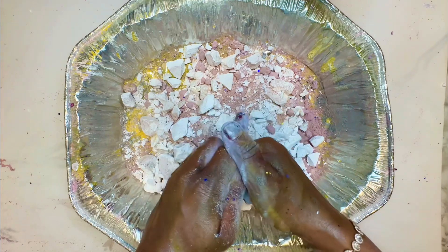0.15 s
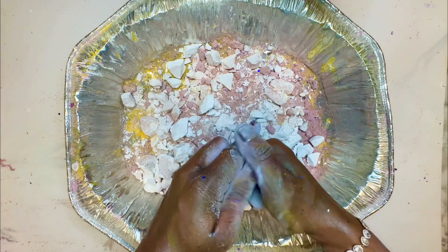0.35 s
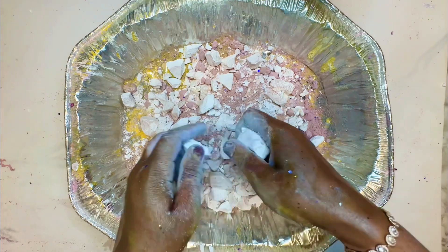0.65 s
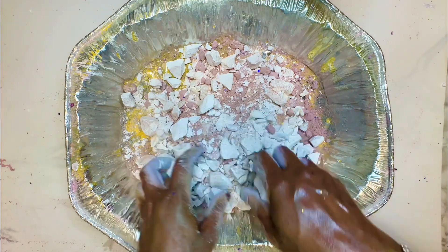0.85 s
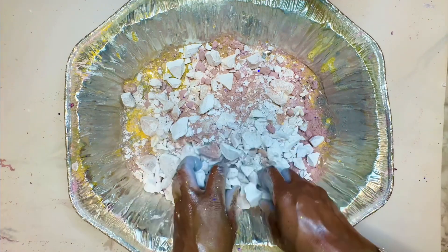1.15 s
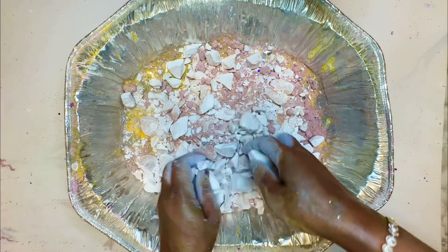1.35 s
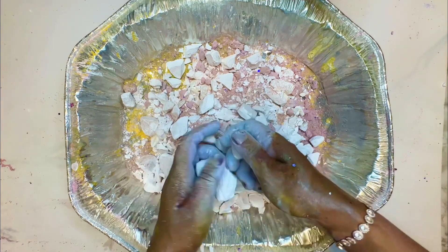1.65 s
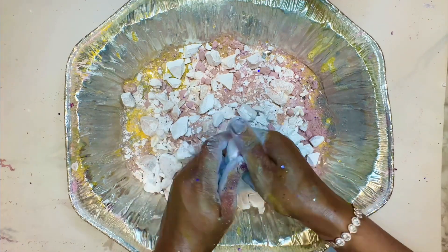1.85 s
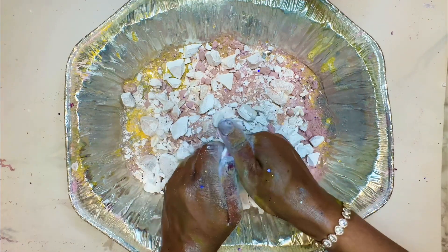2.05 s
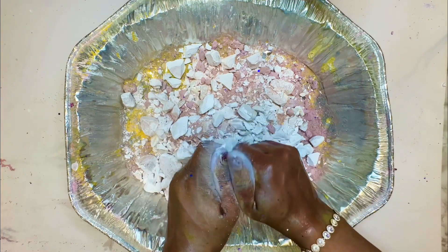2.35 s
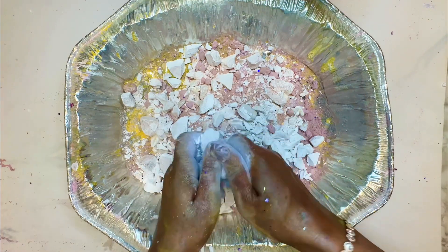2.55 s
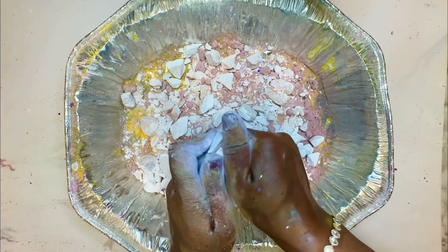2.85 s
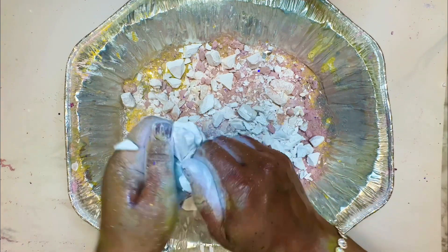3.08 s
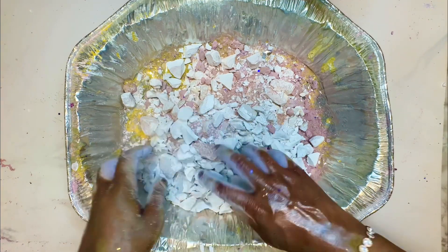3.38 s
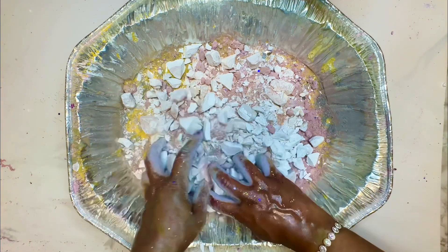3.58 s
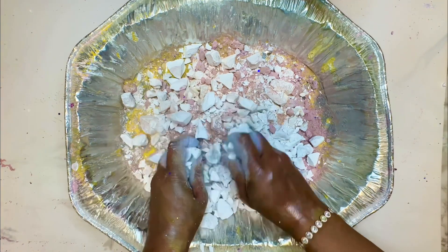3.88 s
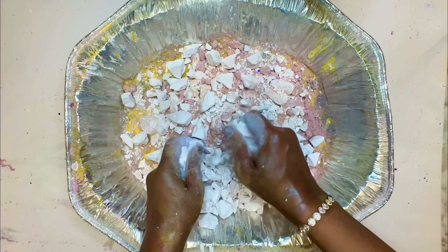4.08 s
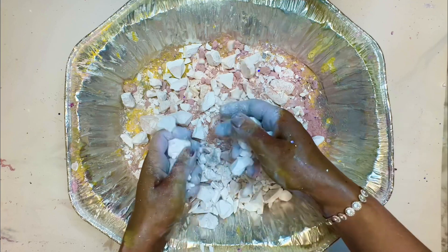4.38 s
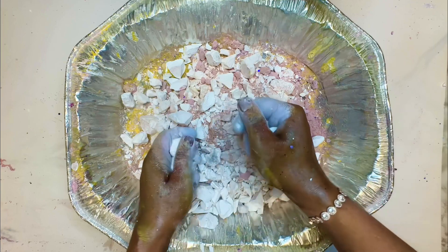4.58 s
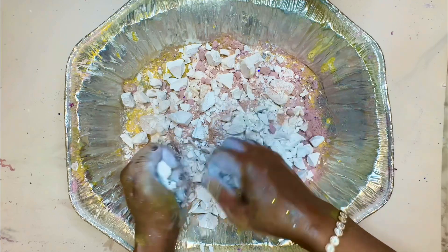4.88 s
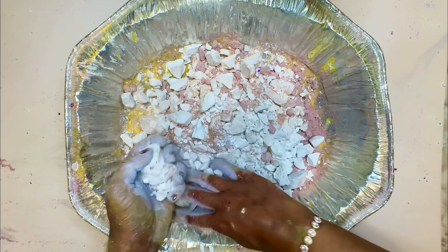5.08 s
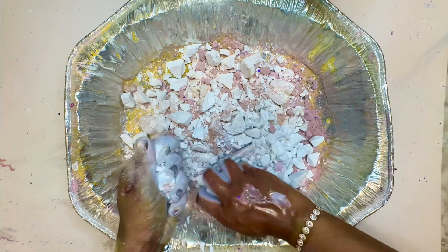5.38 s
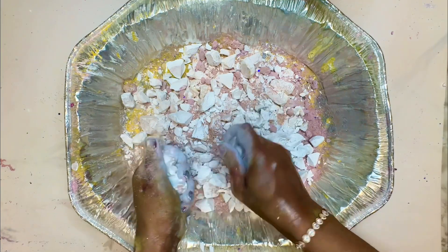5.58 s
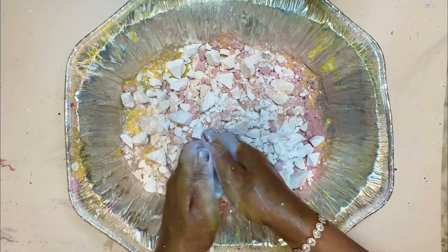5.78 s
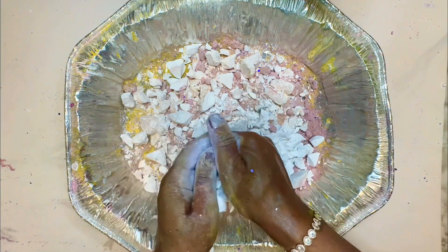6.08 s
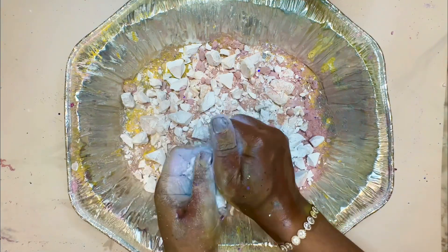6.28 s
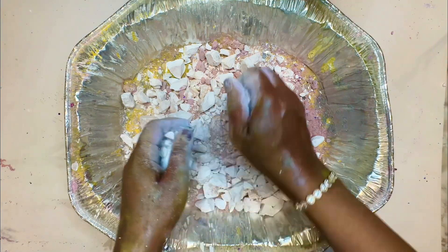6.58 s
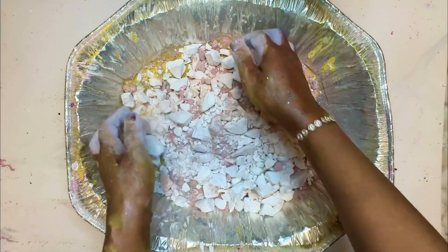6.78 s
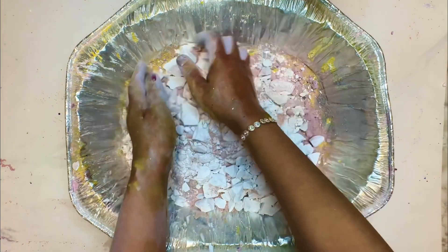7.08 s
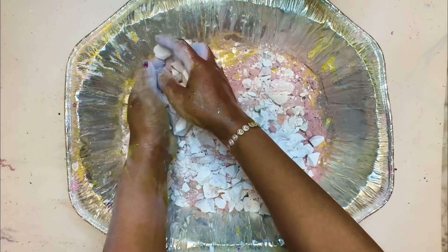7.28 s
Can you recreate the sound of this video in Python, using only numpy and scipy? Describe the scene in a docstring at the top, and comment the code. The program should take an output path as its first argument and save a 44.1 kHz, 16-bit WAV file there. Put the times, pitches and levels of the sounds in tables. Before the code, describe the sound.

Close up in a small, dry room, two hands squeeze brittle dried chalk. Sparse snaps and soft powdery squeezes come first, with a short rattle of pieces on the thin metal tray, then a loud crack. Midway come raking and dense crunching; after quieter squeezing, loud clattering strokes sweep through the heap at the end. A low motor hum flutters rapidly underneath.

```python
"""A steady motor hum, beating ten times a second, runs throughout; over it two hands crush dried chalk.
Brittle fracture snaps the pieces: each break excites damped modes of the piece and a bright crack.
Pieces knock a thin metal tray, whose dispersive bending waves color the note, and are raked through crumbs.
Granular flow makes the crunch: thousands of small resonant contacts follow the effort of the hands.
A small room adds a diffuse tail; two closely placed microphone ports pick it up and the hardest blows clip."""
import sys
import numpy as np
from scipy import signal
from scipy.fft import rfft, irfft, next_fast_len
from scipy.io import wavfile
from scipy.ndimage import uniform_filter1d

SR = 44100
rng = np.random.default_rng(int(sys.argv[2]) if len(sys.argv) > 2 else 0)


def to_wav(s):
    """Save 16-bit WAV."""
    ch = np.atleast_2d(s).T  # columns
    pcm = np.round(np.clip(ch, -1, 1) * 32767)  # PCM
    wavfile.write(sys.argv[1], SR, pcm.astype(np.int16))


N = 327662  # length in samples
BLOW = np.arange(2800) / SR  # time axis of one blow, s

# pieces breaking in the hands: (t/s, crumbling time/ms, ring f/Hz, ring level/dB, crack level/dB)
SNAPS = [(0.3654, 1.7, 1340, -18, -25), (0.367, 2.9, 2700, -21.5, -16), (0.6131, 2.4, 2960, -31.5, -21.5),
         (0.6191, 0.7, 4150, -30, -17.5), (0.635, 0.75, 2080, -32.5, -27.5), (0.7005, 1.9, 3830, -42, -44),
         (0.7622, 3.4, 2220, -33.5, -44), (0.8, 0.85, 3120, -47.5, -61), (0.92, 2.1, 3304, -50, -38.5),
         (1.143, .7, 3900, -40.5, -25.5), (1.148, 1, 2540, -28, -41), (1.162, 0.82, 990, -31.5, -29),
         (1.3238, 1.7, 2440, -21.5, -39), (1.5534, 2, 1340, -38, -77), (1.5744, 0.3, 814, -38, -82),
         (1.886, 0.87, 3070, -33.5, -47), (1.909, 3.1, 2770, -55, -39), (2.225, 1.2, 1240, -15, -29),
         (2.2262, 0.35, 2520, -17.5, -21), (2.4934, 4.5, 2580, -40, -32), (2.504, 4.9, 2440, -37.5, -43),
         (2.6702, 0.66, 1980, -36.5, -49.5), (2.7956, 0.52, 2900, -42.5, -47),
         (2.8747, 0.7, 1415, -10, -15), (2.875, 0.94, 910, -14, -22), (2.885, 3.5, 1040, -25, -25),
         (2.9, 2.3, 4200, -23, -16.5), (2.931, 0.74, 3000, -22, -25.5), (3.03, 1.8, 4450, -44, -29.5),
         (3.2423, 5.9, 1925, -40.5, -39), (3.27, 2.1, 3000, -43, -34), (3.2932, 2.1, 3080, -25.5, -28),
         (3.3118, 1.2, 2565, -34, -24.5), (3.417, 2, 2200, -28, -28), (3.665, 2, 3000, -45, -21),
         (3.728, 3.7, 2900, -34.5, -28.5), (3.9082, 1.7, 3200, -34, -28), (3.9869, 1.7, 4100, -28.5, -24.5),
         (4.017, 0.91, 3580, -32.5, -21), (4.0332, 8.7, 3080, -25.5, -18.5),
         (4.0535, 1.1, 3300, -14.5, -17.5), (4.0609, 9.4, 4000, -20, -20.5), (4.096, 0.75, 3500, -36, -32),
         (4.134, 6.2, 4130, -30.5, -34), (4.197, 4.4, 4200, -37.5, -30.5), (4.3745, 3, 2420, -6, -30),
         (4.5217, 2.2, 2170, -21.5, -25.5), (4.548, 3, 3500, -33, -28), (4.5818, 0.54, 2360, -14.5, -23),
         (4.582, 1.6, 1590, -20, -18), (4.6104, 4.1, 4230, -30.5, -22.5), (4.6364, 1.1, 3180, -22, -24),
         (4.639, 0.64, 3520, -19.5, -25), (4.698, 1.5, 2880, -17.5, -19), (4.7487, 5.9, 2800, -23.5, -21.5),
         (4.7659, 1.7, 2340, -22.5, -22), (4.792, 2, 3000, -33.5, -30), (4.809, 1.5, 2800, -32.5, -38),
         (4.8334, 2.9, 2300, -23.5, -20.5), (4.8428, 0.52, 3360, -19.5, -18),
         (4.8487, 0.59, 2900, -18.5, -22), (4.857, 1.1, 2630, -23, -31), (4.8751, 2, 2760, -21, -23.5),
         (4.886, 2.1, 2800, -31, -23.5), (4.938, 3.8, 2840, -35.5, -30), (5.047, 0.71, 3010, -37.5, -48),
         (5.176, 2, 2480, -34, -48), (5.295, 3.9, 3300, -39, -24.5), (5.3721, 0.92, 2670, -25, -24),
         (5.3809, 1.2, 2580, -26.5, -24.5), (5.4341, 5.8, 1480, -28.5, -30.5),
         (5.447, 2, 3500, -39.5, -31.5), (5.557, 1.8, 1990, -38, -37), (5.632, 13, 3470, -35.5, -31),
         (5.744, 4, 3600, -46, -37.5), (5.7826, 3, 2050, -40.5, -42), (5.879, 2.6, 4150, -36.5, -41.5),
         (6.002, 0.84, 4500, -43.5, -31), (6.09, 2.8, 2160, -36, -36), (6.1449, 0.56, 3940, -40.5, -40.5),
         (6.192, 0.34, 1460, -13, -13.5), (6.1972, 1.9, 2610, -21, -24), (6.2026, 1.1, 2480, -30, -16.5),
         (6.219, 0.97, 2780, -17.5, -31), (6.2318, 1.6, 1260, -17.5, -26.5),
         (6.2352, 2.2, 3010, -15, -10.5), (6.31, 0.5, 2580, -12.5, -23), (6.3104, 1.1, 1980, -20, -26),
         (6.414, 1.2, 2100, -35.5, -46), (6.4886, 3.1, 2480, -43, -44), (6.6633, 6.7, 2744, -31.5, -30),
         (6.681, 2, 3500, -41, -30.5), (6.746, 4, 3020, -24.5, -17.5), (7.1545, 1.9, 3000, -25, -25),
         (7.196, 4.4, 2400, -22, -24.5), (7.42, 1.3, 3500, -38.5, -27)]
SNAP_CYCLES = 2.6  # cycles of ringing to 1/e
PALM_HZ, PALM_DB = 566, -15.5  # dull knock of the cupped hands; level against the ring


def snaps():
    """Brittle fracture: chalk breaks and rings between the fingers, and the cupped hands resonate dully."""
    out = np.zeros((2, N))
    for s, ms, hz, ring_db, crack_db in SNAPS:
        add(out, s, piece(ms, hz, ring_db, crack_db, cycles=SNAP_CYCLES, dull_db=-6))
        push = fracture(ms, width=0.15, first=1.13)
        palm = through(push, mode(PALM_HZ, cycles=1.5, wave=np.cos))
        add(out, s, sized(palm, ring_db + PALM_DB))
    return out


# color of a ringing chip: (f/Hz, relative level/dB)
CHIP = [(100, -66), (300, -3), (500, -3), (700, 1.5), (1000, 0.5), (1400, 1.5), (1850, -3), (2600, 0.5),
        (3500, -5), (5000, -13), (9000, -29)]
# color of the crack: (f/Hz, relative level/dB)
CRACK = [(300, -5.5), (1500, -27), (3500, -6.5), (5000, -0.5), (7000, 3), (10000, 3.5), (11400, -1),
         (13500, -21.5), (15500, 3), (17000, -5)]
TREBLE_WIDTH = 0.42  # share of the opposite-sign signal in the crack


def piece(ms, hz, ring_db, crack_db, cycles, dull_db, overtone=1.385, overtone_db=-5):
    """Modal excitation: a break rings two damped modes of the piece, with a dull clack and a bright crack."""
    chip = response(CHIP)
    push = fracture(ms, width=0.39, first=0.83)
    fundamental = evened(mode(hz, cycles, np.cos))
    upper = evened(mode(hz * overtone, cycles, np.cos))
    modes = fundamental + gain_of(overtone_db) * upper
    dull = evened(through(fracture(ms * 1.36, width=0.75, first=0.28), chip))
    ring = evened(through(through(push, chip), modes)) + gain_of(dull_db) * dull
    crack = through(fracture(ms, TREBLE_WIDTH, first=0.25), response(CRACK))
    return sized(ring, ring_db) + sized(crack, crack_db)


def fracture(ms, width, first, lumpy=0.63, rise_ms=0.29):
    """Crack propagation: a first break, then a decaying run of uneven micro-fractures."""
    t_ms = BLOW * 1000
    force, unevenness = rng.standard_normal((2, len(BLOW))), rng.standard_normal(len(BLOW))
    decay = np.exp(lumpy * np.clip(unevenness, -2, 2) - t_ms / ms)
    run = force * decay * (1 - np.exp(-t_ms / rise_ms))
    run /= np.linalg.norm(run, axis=1, keepdims=True)
    run[0, np.searchsorted(t_ms, rise_ms)] += first
    return spread(uncolored(run), width)


def uncolored(x, size=60):
    """Minimum-phase whitening: broad spectral humps are evened, so the struck object sets the color."""
    power = uniform_filter1d(abs(rfft(x)) ** 2, size=size, axis=1)
    cepstrum = irfft(np.log(power / power.mean(1, keepdims=True)) / 2)
    # folding the cepstrum onto positive time makes the correction causal
    cepstrum[:, 1:] *= 2
    cepstrum[:, x.shape[1] // 2:] = 0
    return irfft(rfft(x) / np.exp(rfft(cepstrum)))


def mode(hz, cycles, wave=np.sin):
    """Damped oscillator: a ring that falls to 1/e in so many cycles."""
    return np.exp(-BLOW * hz / cycles) * wave(2 * np.pi * hz * BLOW)


# pieces striking the tray:
# (t/s, rattling time/ms, piece f/Hz, ring level/dB, crack level/dB, tray f/Hz, tray level/dB)
KNOCKS = [(0.962, 1.5, 1090, -20, -45, 350, -16), (0.9864, 1.56, 1160, -8, -26, 500, -1.5),
          (0.9991, 1.5, 1070, -33.5, -37, 352, -7.5), (1.019, 2.7, 1240, -32, -38.5, 410, -20.5),
          (1.046, 3, 1340, -31, -41.5, 383, -20), (1.079, 3, 1350, -31.5, -37, 430, -22),
          (1.092, 2.8, 1300, -39, -45, 420, -22), (1.11, 2, 1200, -38, -49, 275, -20),
          (1.127, 1.4, 860, -35.5, -28.5, 447, -15), (1.1478, 1.7, 1140, -22.5, -45, 410, -20),
          (1.266, 2, 1184, -35, -45, 477, -28), (1.3237, 1.8, 1335, -15, -33, 550, -22.5),
          (1.229, 2, 900, -45, -51, 482, -29), (1.7091, 2.3, 1520, -38, -54, 453, -38.5),
          (3.286, 1.7, 1300, -44, -51, 400, -28.5), (3.302, 2, 1290, -31, -46, 380, -28),
          (3.3492, 1.5, 880, -26.5, -33, 294, -15.5), (3.3969, 4.6, 1200, -10, -29.5, 384, -13.5),
          (3.4981, 2.4, 1170, -13.5, -40, 390, -15), (3.5061, 11, 1160, -11.5, -25.5, 434, -14),
          (3.537, 3, 1300, -22, -35, 445, -22), (3.5546, 7, 1300, -12.5, -17.5, 373, -12),
          (3.586, 6.7, 1270, -17, -30, 500, -25), (3.597, 13, 1385, -21.5, -24, 385, -12),
          (3.6086, 1.1, 1210, -17.5, -39, 447, -17), (3.6334, 3.9, 1150, -21, -46.5, 427, -17),
          (3.647, 2.7, 1300, -38, -44, 427, -17), (3.6551, 1.5, 1380, -18, -39.5, 388.5, -21),
          (3.708, 3.4, 1390, -37, -42, 420, -24), (3.799, 4.5, 1190, -14.5, -27, 410, -12.5),
          (3.82, 2.6, 1210, -21, -36, 406, -14), (3.838, 8.3, 1300, -22.5, -43, 428, -17),
          (3.853, 1.6, 1400, -24, -27, 450, -21), (3.864, 2.7, 1350, -35, -40, 417, -17.5),
          (3.882, 3, 830, -13.5, -18.5, 463, -10.5), (3.938, 1.5, 1250, -35, -48, 453, -33.5),
          (3.948, 3.2, 894, -32, -53, 432, -25), (4.251, 3.75, 1430, -26.5, -31.5, 716, -28.5),
          (4.374, 2.8, 1440, -5, -17, 586, -22), (4.3765, 4.3, 800, -9, -32.5, 680, -24),
          (4.385, 3, 800, -33, -40, 636, -17), (4.5522, 3.6, 826, -29, -36, 473, -18.5),
          (4.411, 1.5, 1510, -45, -29.5, 604, -29.5), (4.431, 2, 1400, -29, -46, 650, -30),
          (4.4572, 2.2, 1010, -28, -45, 450, -20.5), (4.5332, 1.6, 1120, -15, -41, 495, -15.5),
          (4.642, 1.6, 2730, -45, -39, 320, -21), (4.715, 1.3, 1230, -8, -29, 474, -8),
          (4.778, 14, 1100, -39, -48, 524, -26), (5.009, 1.8, 1290, -48, -48, 463, -26),
          (5.06, 3.3, 1300, -32, -45, 470, -23.5), (5.1, 1.6, 1300, -15, -26, 457, -7.5),
          (5.1034, 8.8, 900, -29, -28, 211, -15), (5.174, 2, 1250, -30.5, -48, 416, -27),
          (5.219, 4, 850, -40, -41, 406, -18), (5.309, 2, 850, -35, -47, 400, -27.5),
          (5.2099, 11, 2800, -22.5, -23, 392, -16.5), (5.245, 8.3, 840, -45, -44, 348, -16),
          (5.3218, 0.96, 1390, -29, -51.5, 335, -20.5), (5.3874, 12, 1245, -33, -44.5, 477, -19),
          (5.521, 2.2, 1300, -59, -52, 418, -34), (6.041, 2, 1310, -57, -54, 450, -34.5),
          (6.728, 1.7, 790, -31, -42, 490, -26.5), (6.0594, 2.8, 1350, -18.5, -41, 492, -23.5),
          (6.7605, 5.5, 1304, -8, -12, 385, -7), (6.791, 2.7, 1170, -17, -38.5, 480, -23.5),
          (6.8025, 4.6, 1300, -9.5, -29, 535, -11.5), (6.806, 12, 850, -17, -20, 696, -6),
          (6.82, 3.3, 1010, -21, -36, 294, -14), (6.826, 2.2, 1300, -32, -41, 454, -11),
          (6.899, 18, 730, -7.5, -16, 370, -5), (6.9116, 35, 1210, -18, -27, 315, -5),
          (6.9412, 5.6, 786, -5.5, -9.5, 344, -13), (6.924, 7.1, 1340, -10.5, -32, 523, -12),
          (7.017, 5.9, 1360, -15.5, -32, 470, -13.5), (7.031, 4, 1300, -25, -38, 332, -12),
          (7.048, 10, 1210, -16.5, -41, 600, -14), (7.0653, 11, 1250, -10.5, -25.5, 350, -15),
          (7.082, 4.6, 1410, 2, -14, 575, -15.5), (7.086, 6.4, 820, -7, -12, 756, -1),
          (7.098, 6.4, 900, -17, -26, 493, -11), (7.121, 2.7, 1270, -18, -34, 457, -20),
          (7.144, 4, 1290, -18.5, -33, 490, -20), (7.1799, 4.3, 2100, -17, -41, 484, -31),
          (7.2037, 5.2, 1390, -14, -24, 202, -33.5), (7.245, 1.8, 790, -27, -43, 450, -27),
          (7.305, 1.6, 1310, -37, -41, 400, -23), (7.357, 2.9, 1230, -34, -31, 306, -28)]


def knocks():
    """Impact: a falling or shoved piece rings its own modes and those of the tray."""
    out = np.zeros((2, N))
    for s, ms, hz, ring_db, crack_db, tray_hz, tray_db in KNOCKS:
        add(out, s, tray_note(ms, tray_hz, tray_db))
        add(out, s, piece(ms, hz, ring_db, crack_db, cycles=1.94, dull_db=-4))
    return out


def tray_note(ms, hz, db):
    """Forced plate vibration: a short note and a rattle; the heap damps the tray quickly."""
    tray = tray_response()
    push = through(fracture(ms, width=0.083, first=1.26), tray)
    note = evened(through(push, mode(hz, cycles=1.71)))
    rattle = evened(through(fracture(ms * 1.93, width=0.067, first=0.37), tray))
    return sized(note + gain_of(-2.5) * rattle, db)


# color of the struck tray: (f/Hz, relative level/dB)
TRAY = [(30, -45), (80, -39), (150, -18), (210, -9), (270, -8), (350, -2), (550, 0.5), (720, -2),
        (950, -16), (1300, -7.5), (1800, -33.5), (4000, -37.5)]
# scale of the bending-wave delay (s), and the range over which it varies (Hz)
BEND_S, BEND_LOW_HZ, BEND_TOP_HZ = 0.002636, 79.4, 1497


def tray_response(size=4096):
    """Dispersion: low bending waves cross thin metal more slowly than high, so a knock sweeps downward."""
    hz = np.fft.rfftfreq(size, 1 / SR)
    delay_s = BEND_S * (np.sqrt(BEND_TOP_HZ / np.clip(hz, BEND_LOW_HZ, BEND_TOP_HZ)) - 1)
    phase = -2 * np.pi * np.cumsum(delay_s) * hz[1]  # phase integrates the group delay
    return irfft(rfft(response(TRAY), size) * np.exp(1j * phase))[:size // 2]


# chalk faces sliding under load before they give:
# (start t/s, length/s, ring f/Hz, ring level at the crest/dB, hiss level at the crest/dB)
SCRAPES = [(0.293, 0.11, 3020, -33.5, -48.5), (3.057, 0.13, 8700, -39.5, -66),
           (3.547, 0.048, 3200, -18.5, -17.5)]


def scrapes():
    """Stick-slip friction: fast irregular slips swell, ring the piece and hiss, then let go."""
    out, grit = np.zeros((2, N)), response(GRIT)
    for s, length, hz, ring_db, hiss_db in SCRAPES:
        u = np.linspace(0, 1, round(length * SR))
        slips = spread(rng.standard_normal((2, len(u))), width=0.39)
        ring = evened(np.diff(through(slips, mode(hz, cycles=1.0)), prepend=0))
        hiss = evened(through(slips, grit))
        envelope = np.sin(np.pi * u ** 2.1)  # slow swell, quicker release
        add(out, s, envelope * (gain_of(ring_db) * ring + gain_of(hiss_db) * hiss))
    return out


# strokes through the heap: (start t/s, length/s, growth/(dB/s),
# rolling pieces level/dB, rubbing chips level/dB, powder level/dB, weight on the tray level/dB)
RAKES = [(0.951, .2, -18, -30, -39.5, -34.5, -35), (1.165, .18, -23.5, -38, -48, -43.5, -45.5),
         (1.368, .2, -12, -46.5, -58, -56, -51), (3.24, 0.227, 8.5, -36.5, -44.5, -42.5, -42),
         (3.471, .2, 7, -28, -35.5, -34.5, -37), (3.677, .1, -0.5, -27.5, -38.5, -35, -41),
         (3.78, .11, -10, -27, -35, -30.5, -58), (3.911, .12, -65, -40.5, -40.5, -40.5, -50.5),
         (4.031, .3, -23, -49, -48, -42.5, -64), (4.341, .44, 0.5, -40.5, -41, -39.5, -63),
         (4.958, .07, 41, -32, -43, -44, -61), (5.05, .1, -2.5, -27, -39, -38, -37),
         (5.17, .085, 30.5, -24.5, -37, -34, -38), (5.282, .125, -2, -31, -40.5, -39.5, -39.5),
         (5.421, .24, -7.5, -43, -48, -46.5, -45), (6.663, .075, 153, -36.5, -45, -41.5, -54.5),
         (6.736, .06, -1, -27.5, -31.5, -25, -27), (6.803, .045, -70.5, -24, -29, -25, -23),
         (6.85, .045, 0, -32, -35, -28, -35), (6.898, .09, -45, -23, -28.5, -23, -18.5),
         (6.985, .16, 0, -24, -28, -24, -25.5), (7.14, 0.31, -36.5, -32, -37, -37.5, -42)]
RAKE_RISE_S, RAKE_FALL_S = 0.024, 0.02
# squeezes of a handful between the palms: (crest t/s, swelling/s, easing/s,
# rolling pieces level/dB, rubbing chips level/dB, powder level/dB)
SQUEEZES = [(0.01, .02, .025, -60, -56.5, -52), (0.218, 0.16, .08, -57, -67.5, -65.5),
            (0.347, .06, .08, -49, -53, -70), (0.591, .055, .05, -63, -54.5, -47),
            (0.781, .03, 0.05, -50, -61, -62), (0.93, .04, .03, -51.5, -55, -52.5),
            (1.72, .04, .06, -53.5, -57.5, -54), (1.845, 0.02, 0.044, -44, -56.5, -54),
            (1.911, 0.026, .03, -43.5, -54, -60), (1.985, .04, .06, -45, -54, -56),
            (2.26, 0.022, 0.043, -50, -55.5, -48), (2.376, 0.041, 0.05, -60, -54, -49.5),
            (2.486, 0.027, .035, -74.5, -57.5, -48.5), (2.64, 0.073, 0.049, -63, -57.5, -50.5),
            (2.76, .05, .09, -57.5, -59.5, -62), (3.0, .08, .07, -57.5, -55, -51),
            (3.132, .05, .03, -54.5, -52, -51), (4.865, 0.011, .045, -50, -47.5, -40),
            (5.68, 0.036, 0.022, -55, -51, -48), (5.792, 0.046, .04, -56, -54, -46),
            (5.941, .055, .035, -52.5, -54, -45.5), (6.045, 0.015, 0.029, -44, -50, -50),
            (6.111, 0.024, .03, -56, -53.5, -49), (6.28, .025, .09, -69, -51, -47),
            (6.444, 0.017, .02, -69, -59, -51), (6.559, 0.041, 0.099, -61.5, -54.5, -47.5)]
# what a blow stirs up: level against part of the blow (dB), time to fall to 1/e (s)
SHED_DB, SHED_S = -11, 0.019  # powder shed by a snap, against its crack
SPLINTER_DB, SPLINTER_S = -20.5, 0.028  # splinters of a snap, against its ring
JOLT_DB, JOLT_S = -13.5, 0.018  # pieces set rolling by a knock, against its tray note
THUMP_DB, THUMP_S = -18.5, 0.01  # thump of the tray floor, against the tray note


def handwork():
    """Power summation: efforts that roll pieces, rub chips, grind powder and press the tray, over time."""
    power = np.zeros((4, N))
    for start, length, growth, *levels_db in RAKES:
        effort = stroke(start, length, growth, RAKE_RISE_S, RAKE_FALL_S)
        power += (gain_of(levels_db)[:, None] * effort) ** 2
    for crest, swelling_s, easing_s, *levels_db in SQUEEZES:
        power[:3] += (gain_of(levels_db)[:, None] * swell(crest, swelling_s, easing_s)) ** 2
    power[0] += aftermath([(s, tray_db + JOLT_DB) for s, *_, tray_db in KNOCKS], JOLT_S)
    power[1] += aftermath([(s, ring_db + SPLINTER_DB) for s, *_, ring_db, _ in SNAPS], SPLINTER_S)
    power[2] += aftermath([(s, crack_db + SHED_DB) for s, *_, crack_db in SNAPS], SHED_S)
    power[3] += aftermath([(s, tray_db + THUMP_DB) for s, *_, tray_db in KNOCKS], THUMP_S)
    return np.sqrt(power)


def stroke(start, length, growth_db_per_s, rise_s, fall_s):
    """Driving effort: a stroke takes hold, grows or slackens exponentially, and lets go."""
    t = np.arange(N) / SR - start
    held = gain_of(growth_db_per_s * (np.clip(t, 0, length) - length / 2))  # 0 dB at the middle
    release = np.exp(-np.clip((t - length) / fall_s, 0, 20))
    return np.clip(t / rise_s, 0, 1) * held * release


def swell(crest, swelling_s, easing_s):
    """Gaussian effort: a squeeze builds smoothly to 1 and eases off at its own rate."""
    t = np.arange(N) / SR - crest
    width_s = np.where(t < 0, swelling_s, easing_s)
    return np.exp(-np.minimum((t / width_s) ** 2 / 2, 20))


def aftermath(blows, fall_s):
    """Exponential relaxation: power of the crumbs or tray stirred by blows (t/s, level/dB)."""
    kicks = np.zeros(N)
    for s, db in blows:
        kicks[round(s * SR)] += gain_of(db) ** 2
    return signal.lfilter([1], [1, -np.exp(-2 / (fall_s * SR))], kicks + 1e-20)


# color of the rolling heap: (f/Hz, relative level/dB)
HEAP = [(30, -40), (80, -47.5), (150, -14), (200, -4), (270, -3), (370, 0), (550, -7), (720, -9),
        (950, -15), (1300, -10.5), (1800, -21.5), (4000, -31.5)]
# color of rubbing chips: (f/Hz, relative level/dB)
RUB = [(300, -18.5), (800, -4), (1300, -3), (1800, 0), (2500, 0), (3300, -3), (4700, -17.5), (8000, -29.5)]
# color of powder and of the hiss of a scrape: (f/Hz, relative level/dB)
GRIT = [(1500, -20), (3500, -1), (5000, -1.5), (7500, 0.5), (10000, 1), (11300, -5), (13500, -69),
        (15300, 12), (16500, -22)]
# color of dusty skin sliding on skin: (f/Hz, relative level/dB)
SKIN = [(800, -28.5), (1750, -13.5), (2250, -0.5), (2800, -16.5), (5000, -28)]
SKIN_DB, SKIN_LIMIT_DB = -5.5, -56  # level against the rubbing, and its ceiling


def crumbs(roll, rub, grind):
    """Granular flow: rolling pieces, rubbing chips, powder and skin follow the hands, giving way in clumps."""
    surge = slides(per_s=60, fall_s=0.01, rest=0.61)
    rolling = grains(HEAP, 155.1, 1448, per_s=1100, uneven_db=3.5, cycles=2.93, width=0.92)
    chips = grains(RUB, 805, 4900, per_s=2000, uneven_db=2.5, cycles=3.2, width=0.51)
    powder = grains(GRIT, 3390, 14440, per_s=16000, uneven_db=3.0, cycles=4.6, width=1.0)
    skin_level = np.minimum(gain_of(SKIN_DB) * rub, gain_of(SKIN_LIMIT_DB))
    skin = noise(SKIN, width=0.4) * skin_level
    return surge * (rolling * roll + chips * rub + powder * grind + skin)


def grains(color, low_hz, high_hz, per_s, uneven_db, cycles, width, count=24):
    """Random resonant contacts: each size of crumb has its ring; the smaller, the more numerous and weaker."""
    out, rings = np.zeros((2, N)), np.geomspace(low_hz, high_hz, count)
    for hz in rings:
        share = hz / rings.sum()
        contacts = 1 + int(per_s * share * N / SR)
        when, size, side, sign = rng.random((contacts, 4)).T
        strength = gain_of(uneven_db * np.minimum(-np.log(size), 4))
        strength = strength * np.sign(sign - .5) / np.sqrt(share)
        clicks = np.full((2, N), 1e-18)
        clicks[:, (when * N).astype(int)] = spread([strength, strength * (2 * side - 1)], width)
        # two-pole resonator
        r, turn = np.exp(-hz / cycles / SR), 2 * np.pi * hz / SR
        out += signal.lfilter([1 - r, 0, r - 1], [1, -2 * r * np.cos(turn), r * r], clicks)
    return evened(through(out, response(color)))


def slides(per_s, fall_s, rest):
    """Avalanche dynamics: over a steady flow, little slides start at once and die quickly."""
    chance, size = rng.random((2, N))
    starts = (chance < per_s / SR) * size ** 2
    return evened(rest + signal.lfilter([1], [1, -np.exp(-1 / (fall_s * SR))], starts))


# small chips: crumbling time (ms), middle ring (Hz), levels against the rubbing (dB)
TICK_MS, TICK_HZ, TICK_RING_DB, TICK_CRACK_DB, TICK_SPREAD_DB = 2.1, 2560, -1, 0.5, 6.5
TICK_LIMIT_DB = -50  # a chip is small: harder rubbing than this makes it no louder


def ticks(rub, count):
    """Random brittle failure: small chips give way more often, and up to a limit louder, under hard rubbing."""
    out = np.zeros((2, N))
    wear = np.cumsum(np.sqrt(rub))
    for when, pitch, size in rng.random((count, 3)):
        at = np.searchsorted(wear, when * wear[-1])
        db = min(20 * np.log10(rub[at]), TICK_LIMIT_DB) + TICK_SPREAD_DB * min(-np.log(size), 2)
        hz = TICK_HZ * 2 ** (pitch - .5)
        tick = piece(TICK_MS, hz, db + TICK_RING_DB, db + TICK_CRACK_DB, cycles=1.0, dull_db=-23.0)
        add(out, at / SR, tick)
    return out


# collisions in the heap: rattling time (ms), middle ring and tray note (Hz), levels against the rolling (dB)
JOSTLE_MS, JOSTLE_HZ, JOSTLE_TRAY_HZ = 1.3, 1300, 438
JOSTLE_RING_DB, JOSTLE_CRACK_DB, JOSTLE_TRAY_DB = -4.5, -16, -2


def jostles(roll, count):
    """Random collision: pieces clack on each other and the tray, more often and harder in a faster heap."""
    out = np.zeros((2, N))
    travel = np.cumsum(roll)
    for when, size in rng.random((count, 2)):
        at = np.searchsorted(travel, when * travel[-1])
        db, pitch = 20 * np.log10(roll[at]), 2 ** (size - .5)
        clack = piece(JOSTLE_MS, JOSTLE_HZ * pitch, db + JOSTLE_RING_DB, db + JOSTLE_CRACK_DB,
                      cycles=3.0, dull_db=-6.5)
        note = tray_note(JOSTLE_MS, JOSTLE_TRAY_HZ * pitch, db + JOSTLE_TRAY_DB)
        add(out, at / SR, clack + note)
    return out


# color of the tray floor: (f/Hz, relative level/dB)
BOOM = [(20, -31), (45, -1), (80, 11), (120, 1), (200, 1), (320, -19), (800, -66.5)]
BASS_WIDTH = 0.12  # share of the opposite-sign signal in the tray floor and the room air


def tray_floor(weight):
    """Low-frequency plate motion: the floor of the tray rumbles under the weight of hands and blows."""
    return noise(BOOM, BASS_WIDTH) * weight


# decay of the room: (f/Hz, t60/s)
ROOM = [(150, 0.14), (500, 0.18), (1500, 0.1), (5000, 0.22), (10000, 0.02), (16000, 0.044)]


def room(x, onset_s=0.0033):
    """Diffuse reverberation: a short tail, different at each port, with no note standing out."""
    hz, t, z = signal.stft(rng.standard_normal((2, SR // 2)), SR, nperseg=256)
    decay = gain_of(-60 * t / read(ROOM, hz)[:, None])
    tail = signal.istft(z * decay, SR, nperseg=256)[1]
    build = 1 - np.exp(-(np.arange(tail.shape[1]) / SR / onset_s) ** 2)
    z = rfft(tail * build, 2 * SR)
    even = irfft(z / np.sqrt(uniform_filter1d(abs(z) ** 2, size=80, axis=1)))[:, :len(build)]
    tail = spread(even * build, width=0.7)
    return through(x, tail / np.linalg.norm(tail[0]))


# motor tones: (f/Hz)
HUM_HZ = [120.03, 109.98, 60, 240.06]
# their rms levels, in the same order: (level/dB)
HUM_DB = [-38.5, -47, -61, -68.5]
BEAT_CREST_S = 0.02  # moment when all tones crest together
# color of the room air: (f/Hz, relative level/dB)
AIR = [(20, -11.5), (45, -9), (72, 0.5), (95, -9), (130, -7.5), (200, -14.5), (350, -37), (800, -42.5),
       (2000, -40), (6000, -49), (10500, -42), (12500, -44.5), (16000, -41)]
AIR_DB = -47


def background():
    """Interference: two close motor tones beat ten times a second over the rumble of the room."""
    t = np.arange(N) / SR - BEAT_CREST_S
    hum = np.zeros(N)
    for hz, db in zip(HUM_HZ, HUM_DB):
        hum += np.sqrt(2) * gain_of(db) * np.cos(2 * np.pi * hz * t)
    return hum + gain_of(AIR_DB) * noise(AIR, BASS_WIDTH)


def noise(color, width):
    """Filtered random process: colored stereo noise of rms 1."""
    return evened(through(spread(rng.standard_normal((2, N)), width), response(color)))


def gain_of(db):
    """Logarithmic level: decibels to amplitude."""
    return 10 ** (np.asarray(db) / 20)


def evened(x):
    """Rms normalization: scales to rms 1."""
    return x / np.sqrt(np.mean(x ** 2) + 1e-20)


def sized(x, db):
    """Energy equivalence: gives a short sound the energy of 5 ms at this level."""
    return gain_of(db) * evened(x) * np.sqrt(.005 * SR / x.shape[-1])


def read(points, hz):
    """Logarithmic frequency: interpolates a table on a log-frequency axis."""
    f, value = np.transpose(points)
    return np.interp(np.log(hz + 1), np.log(f + 1), value)


def add(mix, s, sound):
    """Superposition: mixes a stereo sound in at time s."""
    part = mix[:, round(s * SR):][:, :sound.shape[1]]
    part += sound[:, :part.shape[1]]


def response(points, size=4096):
    """Minimum phase: the causal impulse response with this spectrum."""
    log_gain = np.log(gain_of(read(points, abs(np.fft.fftfreq(size, 1 / SR)))))
    return np.fft.ifft(np.exp(np.conj(signal.hilbert(log_gain)))).real[:size // 2]


def through(x, taps):
    """Convolution: passes both channels through an impulse response."""
    size = next_fast_len(x.shape[1] + np.shape(taps)[-1], True)
    return irfft(rfft(x, size) * rfft(taps, size), size)[:, :x.shape[1]]


def spread(pair, width):
    """Sum and difference: the first signal reaches both ports alike, the second with opposite signs."""
    return np.array([pair[0] + width * pair[1], pair[0] - width * pair[1]])


def scene():
    """Superposition: chalk and tray, their reverberation in the room, and the background."""
    roll, rub, grind, weight = handwork()
    chalk = snaps() + knocks() + scrapes()
    chalk += crumbs(roll, rub, grind) + tray_floor(weight)
    chalk += ticks(rub, count=130) + jostles(roll, count=110)
    return chalk + gain_of(-14.5) * room(chalk) + background()


# phase between the two microphone ports: (f/Hz, lead of the left/rad)
PORTS = [(20, .1), (120, .17), (400, .1), (800, .35), (1200, .1), (4000, -.2), (6300, -.6), (8300, -1.4),
         (9700, -1.6), (11200, -2.8), (14000, -3.1), (16000, -3.4)]
# width of the image: (f/Hz, level of the difference between the sides/dB)
IMAGE_WIDTH = [(20, -1.5), (120, -10), (330, -4.5), (600, 5.5), (1100, 0), (16000, -5)]
# balance of the image: (f/Hz, level in favor of the left/dB)
IMAGE_LEAN = [(20, -2), (330, 0.83), (620, -2.2), (1100, 0.89), (16000, -0.25)]
EDGE_HZ = 16300  # upper band limit


def record(dry):
    """Interport phase and saturation: ports agree in the bass, part in the treble; loud blows clip."""
    size = next_fast_len(N + 2048)
    hz, (left, right) = np.fft.rfftfreq(size, 1 / SR), rfft(dry, size)
    lead, lean = read(PORTS, hz), read(IMAGE_LEAN, hz)
    image = spread([left + right, left - right], gain_of(read(IMAGE_WIDTH, hz))) / 2
    image = image * gain_of([lean / 2, -lean / 2])
    ported = irfft(image * np.exp(.5j * np.array([lead, -lead])), size)[:, :N]
    clipped = np.clip(ported, -1, 1)
    band_limit = signal.firwin(255, EDGE_HZ, window=("kaiser", 7), fs=SR)
    return signal.oaconvolve(clipped, band_limit[None], "same")


dry = scene()
out = record(dry)
to_wav(out)
```